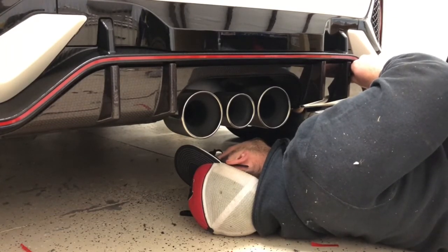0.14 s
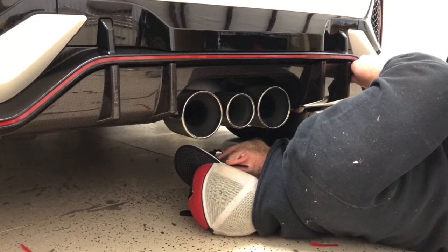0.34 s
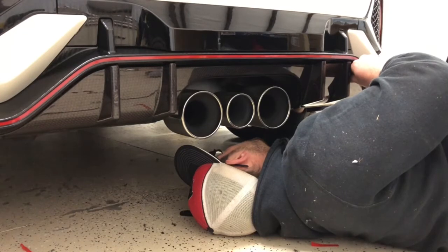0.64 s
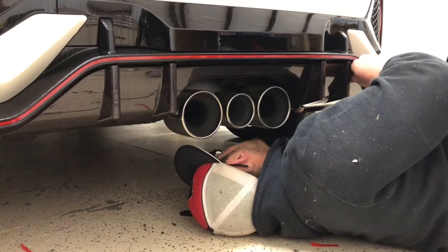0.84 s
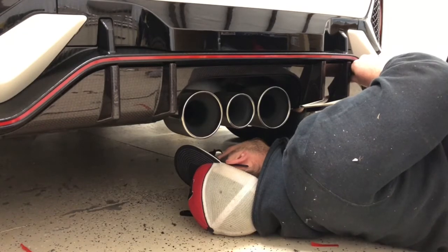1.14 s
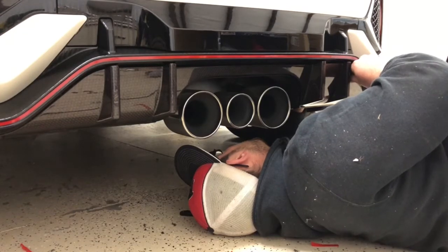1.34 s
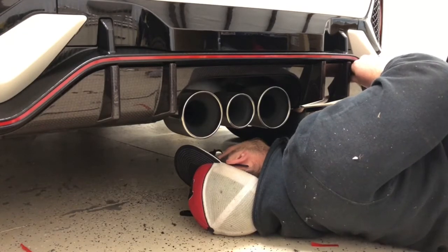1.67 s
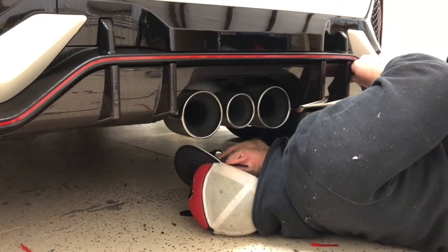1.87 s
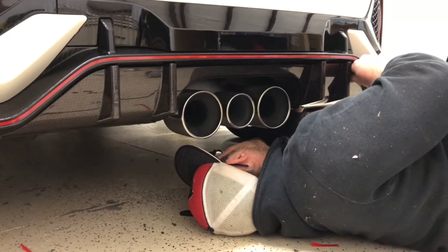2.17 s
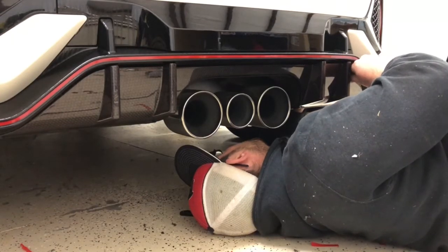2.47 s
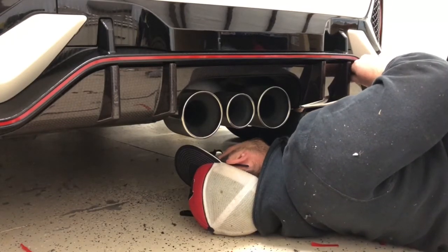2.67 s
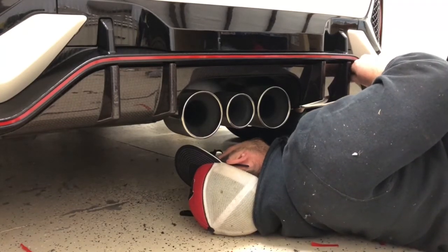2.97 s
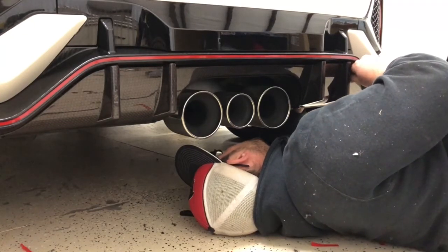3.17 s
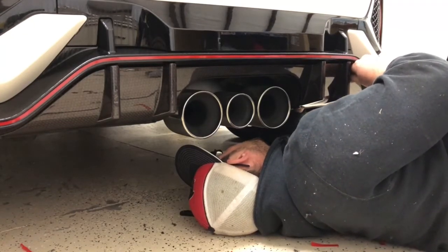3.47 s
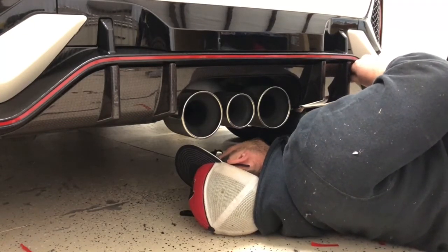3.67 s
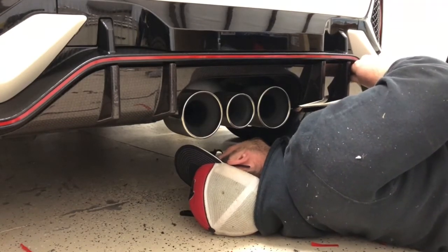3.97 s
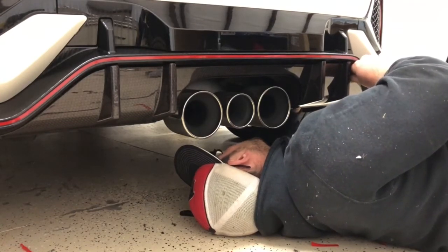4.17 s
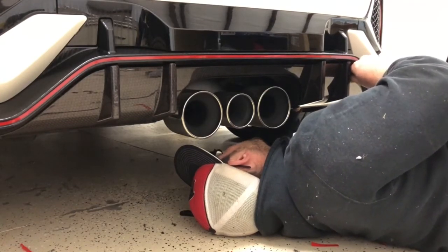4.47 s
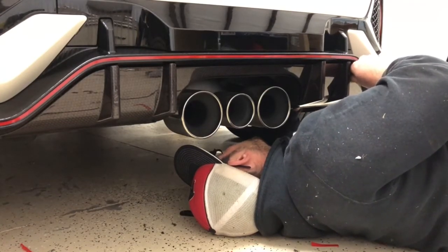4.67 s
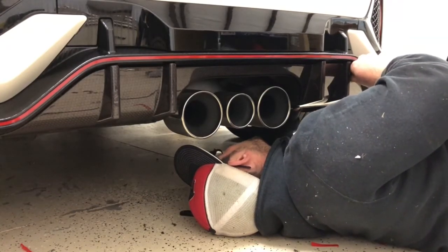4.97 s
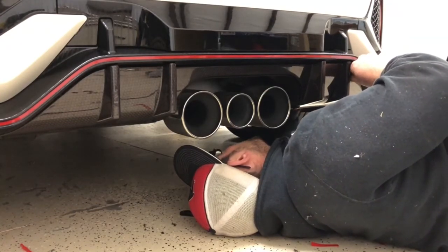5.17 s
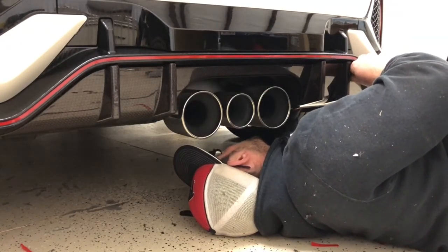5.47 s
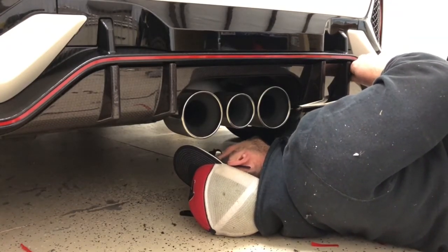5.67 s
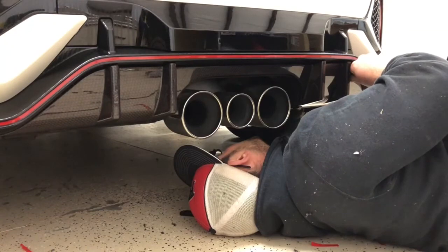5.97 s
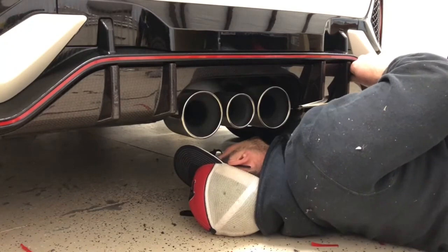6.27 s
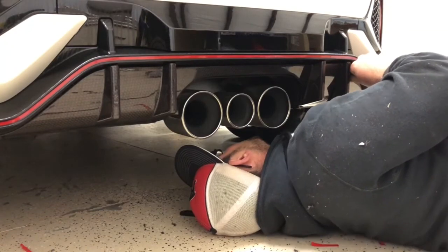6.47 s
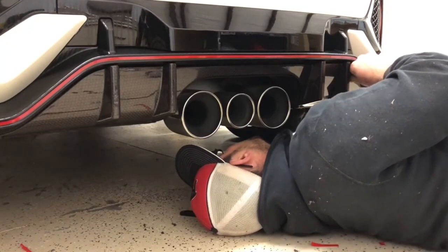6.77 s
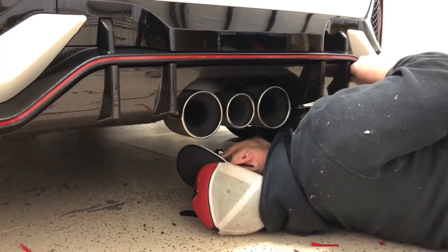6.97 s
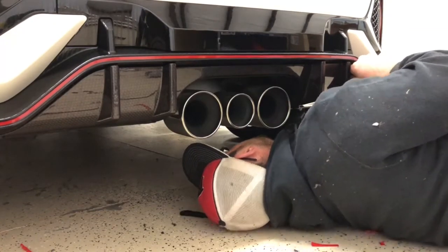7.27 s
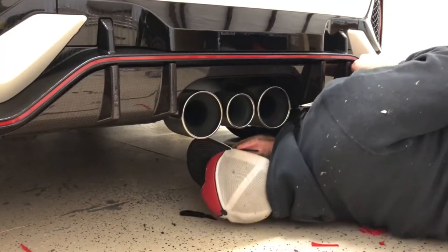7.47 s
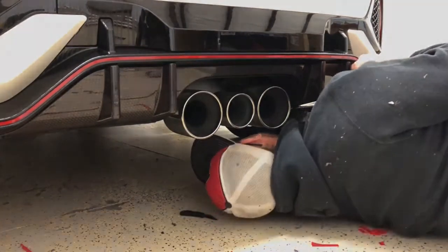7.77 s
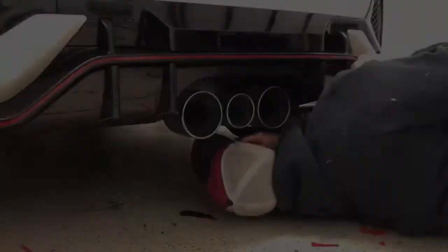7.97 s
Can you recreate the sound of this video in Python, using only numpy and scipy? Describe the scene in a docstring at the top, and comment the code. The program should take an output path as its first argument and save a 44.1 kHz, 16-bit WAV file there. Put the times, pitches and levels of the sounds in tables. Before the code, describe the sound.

Two sharp plastic clip pops, then a zip tie ratchets tight in short snapping tugs on a car panel, ending with sleeve rubs and bumps.

```python
"""Plastic clips and a zip tie on a car panel

Two clips pop through rubber grommets, then a zip tie is pulled tight in short tugs on a car's rear panel.
Each snap is a noise burst shaped by the part's resonances, with a sinking panel thud and a quiet garage's echo.
The tighter the tie, the duller its teeth and the longer they ring. Taps, scuffs and a creak fall in between;
near the end filtered noise rubs like a sleeve and the forearm bumps the panel, over faint rumble and hiss."""
import sys
import numpy as np
from scipy import signal
from scipy.fft import rfft, irfft
from scipy.io import wavfile
from scipy.ndimage import uniform_filter1d, map_coordinates

SR = 44100
rng = np.random.default_rng(int(sys.argv[2]) if len(sys.argv) > 2 else 0)


def waveform_to_disk(signal):
    """Save audio, clipped to [-1, 1], as 16-bit WAV at the path in sys.argv[1]."""
    frames = np.transpose(np.atleast_2d(signal))
    scaled = np.clip(frames, -1, 1) * 32767
    samples = np.round(scaled).astype(np.int16)
    wavfile.write(sys.argv[1], SR, samples)


N = 357650
T = np.arange(32768) / SR  # time axis of one burst, s
HZ = np.fft.rfftfreq(len(T), 1 / SR)


def amp(db):
    """Amplitude of a level in dB."""
    return 10 ** (np.asarray(db) / 20)


def unit(x):
    """x at rms 1."""
    return x / np.sqrt(np.mean(x ** 2) + 1e-20)


def blow(x):
    """x with the energy of one millisecond at full scale."""
    return x / np.linalg.norm(x) * np.sqrt(SR / 1000)


def along(points, hz):
    """Interpolate (f/Hz, value) points on a log frequency axis."""
    f, v = np.transpose(points)
    return np.interp(np.log(hz + 1), np.log(f + 1), v)


def shelf(hz, low_hz, high_hz, db):
    """Treble shelf in dB: 0 below low_hz, db above high_hz."""
    return along([(low_hz, 0), (high_hz, db)], hz)


def lift(hz, width_hz, db):
    """Gain of one resonance standing db above its surroundings."""
    return amp(db / (1 + (2 * (HZ - hz) / width_hz) ** 2))


def resonances(modes):
    """Gain of overlapping resonances, their powers summed."""
    power = 0
    for hz, width_hz, db in modes:
        detuning = (HZ ** 2 - hz ** 2) / (1.5 * width_hz * (HZ + 1))
        power = power + amp(db) ** 2 / (1 + detuning ** 2) ** 1.5
    return np.sqrt(power)


def wobble(rate_hz):
    """Smooth random curve with rate_hz knots a second."""
    knots = rng.standard_normal(int(N * rate_hz / SR) + 4)
    return map_coordinates(knots, [np.arange(N) * rate_hz / SR])


def noise(spectrum):
    """Steady coloured noise of rms 1."""
    gain = amp(along(spectrum, np.fft.rfftfreq(N, 1 / SR)))
    return unit(irfft(rfft(rng.standard_normal(N)) * gain, N))


def dying(t60s):
    """Noise in which each frequency dies at its own speed."""
    hz, t, z = signal.stft(rng.standard_normal(len(T)), SR, nperseg=256)
    decay = amp(-60 * t / along(t60s, hz)[:, None])
    return signal.istft(z * decay, SR, nperseg=256)[1][:len(T)]


def voiced(x, gain, size):
    """Causally give a burst the spectrum gain, keeping its ripple within size bins."""
    own = np.sqrt(np.abs(uniform_filter1d(np.abs(rfft(x)) ** 2, size)) + 1e-12)
    cepstrum = irfft(np.log(np.maximum(gain / own, 1e-6)))
    # folding the cepstrum makes the filter minimum-phase
    half = len(T) // 2
    cepstrum[1:half] *= 2
    cepstrum[half + 1:] = 0
    return blow(irfft(rfft(x) * np.exp(rfft(cepstrum))))


def add(track, s, x):
    """Mix x into the track from time s."""
    part = track[round(s * SR):][:len(x)]
    part += x[:len(part)]


def strokes(rows):
    """Gaussian swells that rise and fade smoothly: (middle t/s, level/dB, half length/s)."""
    t = np.arange(N) / SR
    return sum(amp(db) * np.exp(-((t - s) / half_s) ** 2) for s, db, half_s in rows)


def crack(gain, t60, rattle_db, rattle_t60=0.069, damping_hz=10000):
    """A sudden release: a hard front, then duller scatter between the nearby parts."""
    front, scatter = rng.standard_normal((2, len(T)))
    scatter = irfft(rfft(scatter) / np.sqrt(1 + (HZ / damping_hz) ** 4))
    front = front * amp(-60 * T / max(t60, .002))
    scatter = scatter * amp(rattle_db - 60 * T / rattle_t60)
    return voiced(front + scatter, gain, size=260)


# decay by frequency: f/Hz, t60/s
GARAGE_DECAY = [(200, 0.92), (1200, 0.2447), (2500, 0.35), (7000, 0.4935), (10000, 0.44), (15000, 0.39)]
# colour of the walls' answer: f/Hz, level/dB
GARAGE_COLOUR = [(300, -12), (1200, -2.5), (2200, -1.5), (4000, -0.5), (7000, -2), (10000, -1.5),
                 (15000, -4)]


def garage(x, room_db, build_up_s=0.0022):
    """The walls' diffuse answer to x: decaying noise that builds up first."""
    tail = dying(GARAGE_DECAY) * (1 - np.exp(-(T / build_up_s) ** 2))
    tail = tail / np.linalg.norm(tail)
    return irfft(rfft(x) * rfft(tail) * amp(room_db + along(GARAGE_COLOUR, HZ)))


def click(gain, t60, room_db, rattle_db, seat=1):
    """Direct crack plus the room, which gathers all directions and so evens out narrow resonances."""
    all_round = np.sqrt(np.abs(uniform_filter1d(gain ** 2, size=180)))
    # narrow peaks and dips of the part's seat colour every direction alike
    direct = crack(gain * seat, t60, rattle_db)
    return direct + garage(crack(all_round * seat, t60 / 2, rattle_db - 9.5), room_db)


# the panel's bending wave: f/Hz, density/(dB per Hz)
THUMP_SPECTRUM = [(30, -39.5), (50, -15), (70, -1.5), (110, -4), (170, -1.5), (240, 2), (330, 0.5),
                  (480, -9.5), (640, -12.5), (850, -22), (1500, -49)]
# its decay: f/Hz, t60/s
THUMP_DECAY = [(70, 0.51), (150, 0.25), (300, 0.11), (600, 0.18)]
# low panel modes that ring on: f/Hz, mean level/dB, t60/s
HUM_MODES = [(159, -7.5, 0.46), (207, -2.5, 0.14), (250, 1, 0.059), (297.4, 0, 0.4), (335, -7, .2),
             (599, -10, 0.15)]


def thump(boom_db=0, lag_at_100_hz_s=0.017, ring_db=-11):
    """Bending waves are slower the lower they are, so the thud sinks in pitch; low modes ring on."""
    spectrum = amp(along(THUMP_SPECTRUM, HZ) + along([(85, boom_db), (180, 0.0011)], HZ))
    wave = voiced(dying(THUMP_DECAY), spectrum, size=45)
    ring = 0
    for hz, db, t60 in HUM_MODES:
        decay = amp(db + rng.normal(0, 0.87) - 60 * T / t60)
        ring = ring + decay * np.sin(2 * np.pi * (hz * T + rng.random()))
    wave = wave + amp(ring_db) * blow(ring * (1 - np.exp(-T / 0.0082)))
    lag_s = lag_at_100_hz_s * (100 / np.maximum(HZ, 60)) ** 1.6
    # phase is the running sum of the delay over frequency
    return irfft(rfft(wave) * np.exp(-2j * np.pi * np.cumsum(lag_s) * HZ[1]))


def snaps(rows, seat, room_db, thump_db, rattle_db, yield_db=-31, yield_s=0.0016):
    """The plastic yields, then snaps; every snap kicks the panel equally hard."""
    track = np.zeros(N)
    for s, db, gain, t60, boom_db in rows:
        add(track, s - yield_s, amp(db + yield_db) * crack(gain, t60, rattle_db))
        add(track, s, amp(db) * click(gain, t60, room_db, rattle_db, seat))
        add(track, s, amp(thump_db) * thump(boom_db))
    return track


# background: f/Hz, density/(dB per Hz)
AIR_SPECTRUM = [(12, -45.5), (20, -21), (86, -2.5), (120, -9), (193, -11.5), (216, -17), (255, -13.5),
                (527, -20), (678, -22.5), (849, -24), (923, -25.5), (1260, -27.5), (1400, -28.5),
                (16000, -39)]


def air(level_db=-68.5):
    """The garage's faint rumble and hiss: steady coloured noise."""
    return amp(level_db) * noise(AIR_SPECTRUM)


# fingers and loose tie ends on the panel: t/s, level/dB, hardness as treble/dB, favoured f/Hz
TAP_EVENTS = [(0.31, -54.5, 5, 1500), (1.209, -51.5, 3, 1400), (1.230, -48, -13.5, 1620),
              (2.308, -36, -0.5, 1160), (3.699, -59, -8, 1300), (3.893, -53, -1.5, 1597),
              (5.038, -57.5, -5, 1452), (6.849, -51.5, 1, 2700), (6.955, -50.5, 20, 4070),
              (6.978, -55, 19, 5960), (7.104, -52.5, 14.5, 3020), (7.133, -45.5, 6, 1480),
              (7.355, -36, 3, 2110), (7.362, -26, 9.5, 3850), (7.428, -42.5, -3, 1660),
              (7.454, -43.5, 17, 1410), (8.0219, -45, -7, 1370)]
# resonances of the tapped panel: f/Hz, width/Hz, level/dB
PANEL_RESONANCES = [(452, 280, -2), (1066, 110, 3), (1336, 300, 4), (1820, 240, -7.5), (2400, 570, -6.5),
                    (3790, 840, -8), (6350, 2800, -16.5), (13000, 6600, -28)]


def taps(thump_db=-2, thump_loss_db_per_db=0.52, room_db=-11, lift_db=7):
    """Soft fingers knock dully, hard tie ends tick: the harder the contact, the less the panel thumps."""
    track, body = np.zeros(N), resonances(PANEL_RESONANCES)
    for s, db, treble_db, hz in TAP_EVENTS:
        tone = amp(shelf(HZ, 2200, 7200, treble_db)) * lift(hz, 0.22 * hz, lift_db)
        add(track, s, amp(db) * click(body * tone, t60=.016, room_db=room_db, rattle_db=-13.0))
        add(track, s, amp(db + thump_db - thump_loss_db_per_db * treble_db) * thump())
    return track


def strain(lead_s=0.025, below_db=-47, t60=.04):
    """The plastic crackles faintly as it takes the load, just before a pop or a tug."""
    track, body = np.zeros(N), resonances(CLIP_RESONANCES)
    for s, db, *_ in [*CLIP_POPS, *TIE_TUGS]:
        add(track, s - lead_s, amp(db + below_db) * crack(body, t60, rattle_db=-10.5))
    return track


# clips popping home: t/s, level/dB, brightness/(dB per octave), panel boom/dB, favoured f/Hz
CLIP_POPS = [(0.558, -12.5, -3, 5.5, 1746), (1.8321, -5.5, 3, 2.5, 2420)]
# resonances of a clip: f/Hz, width/Hz, level/dB
CLIP_RESONANCES = [(1070, 120, -2), (1310, 190, -3), (1540, 200, 0), (1879, 200, -2.5), (2210, 170, -5),
                   (2520, 330, -5), (3680, 410, -7.5), (5370, 670, -9), (6890, 770, -5.5), (8300, 1400, -7),
                   (9800, 1400, -5.5), (11300, 1100, -12), (14300, 2500, -18.5)]
# antiresonances of a clip in its grommet: f/Hz, width/Hz, level/dB
GROMMET_DIPS = [(675, 120, -2.5), (3110, 860, -8), (4530, 550, -3)]


def clips(ring_t60=.0135, lift_db=2.5):
    """Each clip pops through its grommet, duller or brighter, and favours one resonance."""
    grommet = np.prod([lift(hz, width_hz, db) for hz, width_hz, db in GROMMET_DIPS], axis=0)
    body = resonances(CLIP_RESONANCES)
    octaves = np.log2(np.clip(HZ, 1500, 10000) / 4000)
    pops = []
    for s, db, tilt_db, boom_db, hz in CLIP_POPS:
        gain = body * amp(tilt_db * octaves) * lift(hz, 0.17 * hz, lift_db)
        pops.append((s, db, gain, ring_t60, boom_db))
    return snaps(pops, grommet, room_db=-8.5, thump_db=-23, rattle_db=-15)


# hand sliding on the panel: middle t/s, level/dB, half length/s
SCUFF_STROKES = [(1.13, -72, 0.03), (1.229, -62.5, 0.029), (2.64, -73, 0.031), (5.105, -70.5, 0.013),
                 (6.872, -68, 0.029), (7.343, -50, 0.004), (7.472, -58.5, 0.032), (7.657, -62, 0.075),
                 (8.055, -70, 0.031)]


def scuffs(grain_db=4, boom_db=-7):
    """Skin sticks and slips on the plastic, stirring the panel's resonances and its low boom."""
    panel_db = 20 * np.log10(resonances(PANEL_RESONANCES) + 1e-6)
    rub = noise(np.column_stack([HZ, panel_db]))
    grainy = unit(rub * amp(grain_db * wobble(250)))
    return strokes(SCUFF_STROKES) * (grainy + amp(boom_db) * noise(THUMP_SPECTRUM))


# tugs: t/s, level/dB, teeth, tooth spacing/s, growth/(dB per tooth), favoured f/Hz, its lift/dB
TIE_TUGS = [(2.8114, -6.5, 4, .0046, -1, 3690, 5), (3.0042, -15.5, 2, .0101, 2.5, 1280, 8.5),
            (5.3634, -9.5, 1, 0, 0, 1680, 5.5), (5.5873, -10, 3, 0.02, 0.94, 2280, 0.5),
            (5.8713, -9.5, 2, .038, -0.4, 980, 1.5), (6.1698, -12.5, 1, 0, -2, 14000, 8),
            (6.4659, -11, 1, 0, 1, 1262, 8.5)]
# resonances of the tie in its mount: f/Hz, width/Hz, level/dB
TIE_RESONANCES = [(680, 89, -10), (986, 37, -2.5), (1270, 510, -5.5), (1440, 270, -2), (1880, 82, -4),
                  (2264, 160, -1), (2420, 290, -6), (3678, 1400, -5), (5000, 1500, -6), (5830, 570, -3),
                  (6752, 830, -1.5), (7930, 2200, -4.5), (10500, 3300, -15.5), (14600, 2300, -10.5)]
# narrow resonances of the mount, same at every tooth: f/Hz, lift/dB
MOUNT_PEAKS = [(1310, 4), (1453, 2.5), (1611, 3), (1770, 7.5), (2602, 3.5), (3622, 6.5), (3924, -1.5),
               (5374, 4.5), (5669, 3.5), (6081, 6), (6529, 5.5), (6905, 5.5), (7949, 7), (8298, 3.5),
               (9066, 1.5), (11361, 8.5)]
SLACK_SIZZLE_DB, TIGHT_SIZZLE_DB = 6.5, -9.5  # treble shelf of a tooth's click
SLACK_T60_S, TIGHT_T60_S = .021, 0.037


def tie(stiffening=1.8, boom_db=-3.5):
    """Tugs drag evenly spaced teeth past the pawl; each tightens the tie, which dulls and rings longer."""
    mount = np.prod([lift(hz, 55, db) for hz, db in MOUNT_PEAKS], axis=0)
    teeth = []
    for s, db, count, gap_s, growth_db, hz, lift_db in TIE_TUGS:
        favoured = lift(hz, .24 * hz, lift_db)
        for k in range(round(count)):
            teeth.append((s + k * gap_s, db + k * growth_db, favoured))
    tightness = np.linspace(0, 1, len(teeth)) ** stiffening
    body, rows = resonances(TIE_RESONANCES), []
    for (s, db, favoured), tight in zip(teeth, tightness):
        sizzle_db = SLACK_SIZZLE_DB + tight * (TIGHT_SIZZLE_DB - SLACK_SIZZLE_DB)
        t60 = SLACK_T60_S + tight * (TIGHT_T60_S - SLACK_T60_S)
        gain = body * favoured * amp(shelf(HZ, 6800, 12000, sizzle_db))
        rows.append((s, db, gain, t60, boom_db))
    return snaps(rows, mount, room_db=-9.0, thump_db=-24.0, rattle_db=-10.5)


def creak(start_s=4.0272, gap_s=.0103, first_db=-46, growth_db=5, count=3,
          wood_hz=2200, lift_db=9, treble_db=-14):
    """A clip sticks and slips in the rubber: a quick, growing run of woody ticks."""
    track = np.zeros(N)
    body = resonances(PANEL_RESONANCES) * lift(wood_hz, 1300, lift_db)
    body = body * amp(shelf(HZ, 2750, 6700, treble_db))
    for k in range(count):
        tick = click(body, t60=0.029, room_db=-12, rattle_db=-10.5)
        add(track, start_s + k * gap_s, amp(first_db + k * growth_db) * tick)
    return track


# sleeve strokes: middle t/s, level/dB, half length/s, treble/dB
SLEEVE_STROKES = [(7.109, -63.5, 0.098, 7.5), (7.259, -61, 0.052, 3), (7.424, -58.5, 0.097, -1),
                  (7.706, -64.5, 0.16, -1.5), (8.038, -62.5, 0.069, -4)]
# cloth rub: f/Hz, density/(dB per Hz)
CLOTH_SPECTRUM = [(59, -58), (100, -4.5), (114, -2.5), (289, -1.5), (570, -7), (1150, -7.5), (1250, -11),
                  (1450, -7.5), (2320, -15), (5530, -16), (16000, -29)]


def sleeve(grain_db=2, catch_db=0.5, room_db=-3):
    """Cloth catches and slips as it slides; the room softens the rub."""
    rub = np.zeros(N)
    for s, db, half_s, treble_db in SLEEVE_STROKES:
        cloth = noise([(hz, level + shelf(hz, 1900, 8000, treble_db)) for hz, level in CLOTH_SPECTRUM])
        rub += strokes([(s, db, half_s)]) * cloth
    rub = rub * unit(amp(grain_db * wobble(150) + catch_db * wobble(35)))
    walls = garage(signal.unit_impulse(len(T)), room_db)
    return (rub + signal.fftconvolve(rub, walls)[:N]) / np.sqrt(1 + amp(room_db) ** 2)


# forearm against the panel: t/s, level/dB
FOREARM_BUMPS = [(7.366, -44), (7.442, -34), (7.456, -33.5), (8.046, -46.5)]
# the hollow it stirs: f/Hz, width/Hz, level/dB
HOLLOW_RESONANCES = [(154.4, 29, 2), (276, 41, 2.5), (670, 170, -2.5), (890, 250, -11), (1600, 280, -15)]


def bumps():
    """The forearm knocks the panel: a soft, hollow contact."""
    track, body = np.zeros(N), resonances(HOLLOW_RESONANCES)
    for s, db in FOREARM_BUMPS:
        add(track, s, amp(db) * click(body, t60=0.071, room_db=-8.5, rattle_db=-10))
    return track


def scene():
    """Clips, tie and handling noises over the garage's background, in mono."""
    snapping = clips() + tie() + strain()
    handling = taps() + creak() + bumps() + scuffs() + sleeve()
    return (snapping + handling + air())[None]


def record(dry, ceiling=1.0, top_hz=16000):
    """Round the highest peaks softly, then cut steeply above top_hz."""
    rounded = dry / (1 + (dry / ceiling) ** 4) ** (1 / 4)
    low_pass = 1 / (1 + (np.fft.rfftfreq(N, 1 / SR) / top_hz) ** 120)
    return irfft(rfft(rounded) * low_pass, N)


dry = scene()
out = record(dry)
waveform_to_disk(out)
```